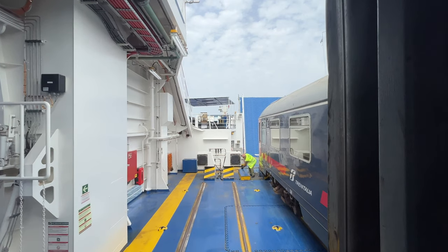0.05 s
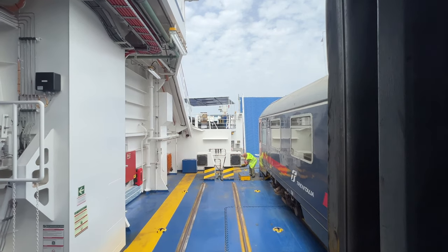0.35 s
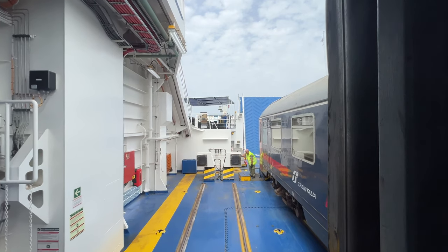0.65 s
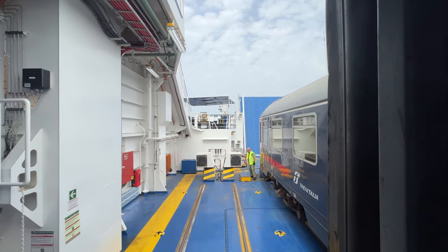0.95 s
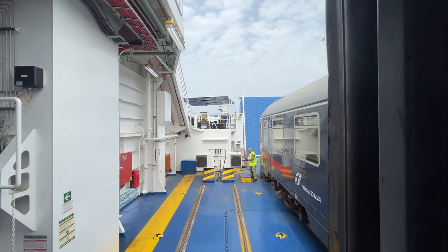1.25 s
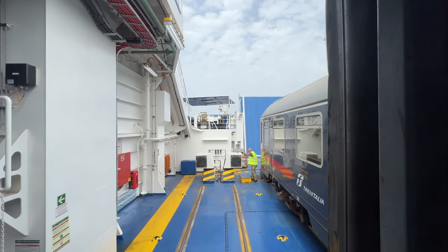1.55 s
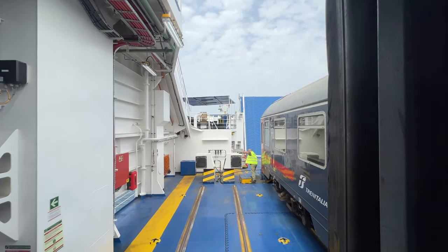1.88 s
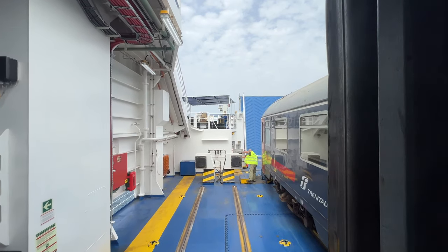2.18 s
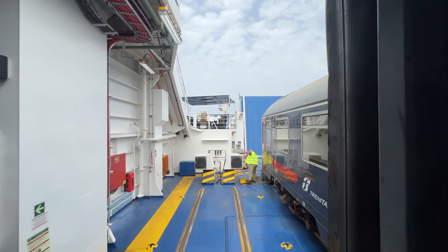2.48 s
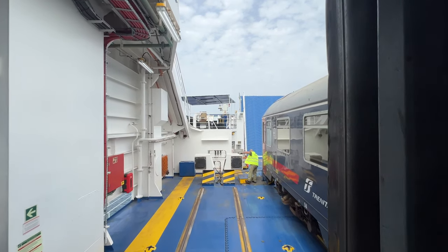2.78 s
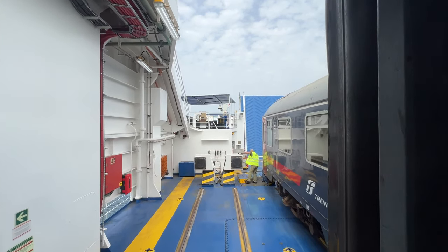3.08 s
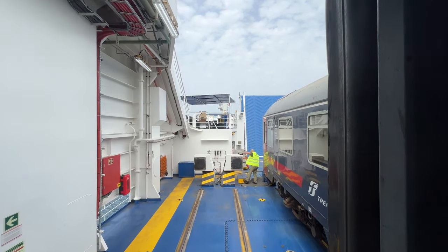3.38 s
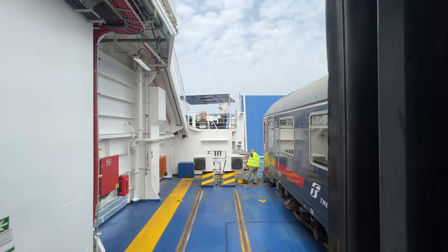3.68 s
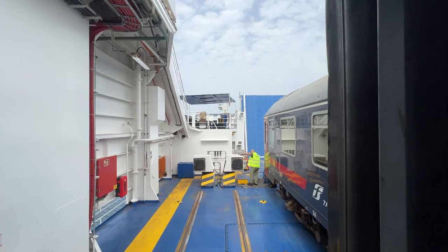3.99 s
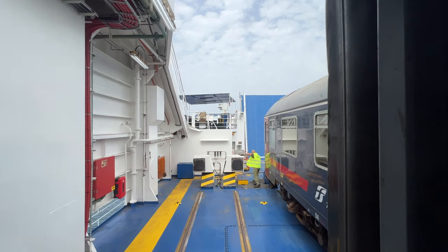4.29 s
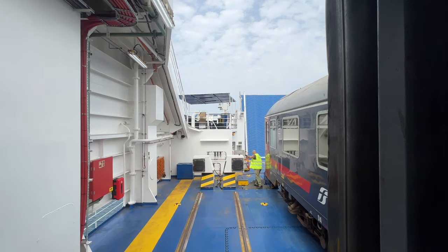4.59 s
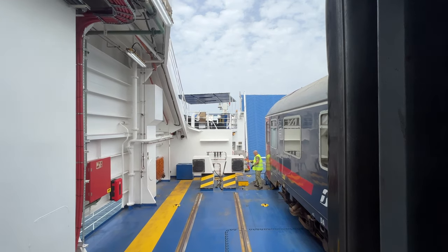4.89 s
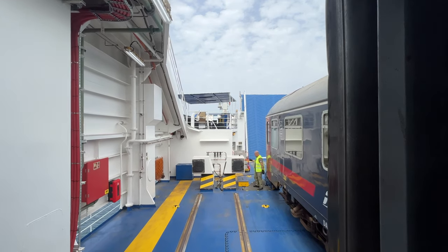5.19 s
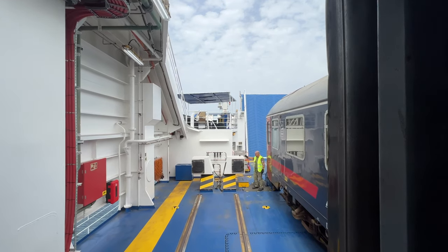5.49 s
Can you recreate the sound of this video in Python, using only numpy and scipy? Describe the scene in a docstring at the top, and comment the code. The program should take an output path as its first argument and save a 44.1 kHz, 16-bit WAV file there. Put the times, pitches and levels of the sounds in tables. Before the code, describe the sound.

A rail carriage rolls slowly onto the steel deck of a ferry, heard from beside the track. Right away a wheel grinds and strikes a joint with a sharp, ringing clank and a trailing clatter. Midway comes a cluster of heavy thumps that boom through the deck, followed by a few softer knocks. Low wheel rumble, rushing ventilation and the ship's machinery hum continue underneath, with a dull knock at the end.

```python
"""Wheels knock, grind and clank sharply over a rail joint, heard from beside the track: a rail carriage
is being pushed slowly onto the steel deck of a ferry. Later comes a heavy thump among smaller ones.
Each blow booms a deck panel and rings wheel and rail; the steel walls ring on.
Underneath are wheel rumble, ventilation noise, soft scuffs and the hum of the ship's machinery."""
import sys
import numpy as np
from scipy import signal
from scipy.fft import rfft, irfft, next_fast_len
from scipy.io import wavfile
from scipy.ndimage import uniform_filter1d, minimum_filter1d

SR = 44100
rng = np.random.default_rng(int(sys.argv[2]) if len(sys.argv) > 2 else 0)


def int16_out(signal):
    """Quantize to a 16-bit WAV file."""
    q = np.round(np.clip(np.atleast_2d(signal).T, -1, 1) * 32767)
    wavfile.write(sys.argv[1], SR, q.astype(np.int16))


N = 249165

# wheels on joints; hardness 0 is cushioned, 1 is bare steel:
# start_s, force_db, hardness, panel_hz, boom_db, favoured_hz
WHEEL_BLOWS = [ (0.000, -32.5, 0, 191.5, -34, 1320), (0.040, -31.5, 0.2, 195, -40, 397),
               (0.103, -34, 0.4, 150, -25.5, 1300), (0.14, -48, 0.6, 204.5, -28.5, 1410),
               (0.256, -15.5, 1, 137.5, -16.5, 1240), (0.284, -19.5, 0.99, 193, -21.5, 1000),
               (0.303, -20, 0.93, 151.4, -20.5, 1450), (0.338, -21.5, 0.94, 139.5, -24.5, 636),
               (0.372, -24.5, 0.9, 151, -37, 940), (0.411, -27.5, 0.92, 172, -24.5, 1220),
               (0.500, -28.5, 0.87, 174.4, -27.5, 990), (0.585, -26.5, 0.74, 177.4, -30.5, 1040),
               (0.690, -31.5, 0.67, 249, -43, 1290), (0.89, -31, 0.2, 116, -36, 1240),
               (2.074, -26.5, 0.1, 204.6, -29, 325), (2.13, -32, 0.2, 248, -31, 557),
               (2.594, -24.5, 0.4, 147.8, -25, 1300), (2.609, -22.5, 0.3, 192.2, -18, 1380),
               (2.649, -23, 0.1, 149.6, -20.5, 298), (2.724, -22, 0.86, 159, -21, 1216),
               (2.734, -15.5, 0.77, 195.7, -11, 1244), (2.747, -15, 0.64, 157.6, -22.5, 1310),
               (2.760, -15.5, 0.57, 193.4, -10, 552), (2.782, -27, 0.2, 98.2, -31, 1260),
               (2.823, -15, 0.41, 189.3, -14, 1310), (2.868, -29.5, 0.2, 276.5, -26, 550),
               (2.955, -21, 0.2, 180.7, -24.5, 490), (2.977, -20, 0.42, 186.8, -17.5, 864),
               (3.050, -22.5, 0.41, 161.1, -21, 990), (3.100, -31, 0.55, 187.6, -25, 1390),
               (3.502, -26, 0.35, 150.6, -21.5, 1220), (3.516, -30.5, 0.4, 298, -22.5, 1190),
               (3.556, -29.5, 0.3, 247, -31, 1270), (5.590, -26, 0.2, 330, -33, 347),
               (5.615, -20.5, 0.32, 201, -25.5, 487)]
# wheel and rail modes: pitch_hz
STEEL_HZ = [474, 527, 569, 633, 694, 787, 827, 954, 1007, 1035, 1069, 1151, 1198, 1248, 1335, 1385, 1431,
            1553, 1690, 1993, 2223, 2390, 2498, 2681, 2869, 3321, 3607, 3817]
# their strengths: level_db
STEEL_DB = [-5, -11.5, -12.5, -3, -11.5, -17, -14, -7.5, -5.5, -7, -16, -5, -6.5, -7, -3.5, -5.5, -9.5, -7,
            -18.5, -18, -19, -24.5, -25.5, -25, -24, -26.5, -33.5, -23]
# noise spectra: freq_hz, relative_density_db
DECK_SPECTRUM = [(50, -25), (110, -6.5), (160, 5.5), (270, -3), (420, -9), (600, -8), (850, -12.5),
                 (1400, -22), (3000, -57.5), (9000, -81)]  # weak modes of the deck
GEAR_SPECTRUM = [(300, -19.5), (800, -6), (1000, -5.5), (1300, 0.5), (1450, -3), (1620, -11), (2200, -21),
                 (3000, -26.5), (4200, -35), (9000, -74.5)]  # weak modes of the running gear
CRACK_SPECTRUM = [(1000, -25), (1900, 12), (2700, 5), (3800, -0.5), (5000, -2.5), (6300, -6.5),
                  (7800, -4.5), (9300, -10), (11000, -32.5)]  # hard contact
RUMBLE_SPECTRUM = [(10, -26.5), (25, -19), (38, -12.5), (50, 4.5), (75, -2.5), (115, -1.5), (165, -9.5),
                   (240, -15), (330, -16), (450, -26.5), (900, -75)]  # rolling wheels
RUSH_SPECTRUM = [(150, -11.5), (450, -2), (620, -3), (800, -2.5), (1000, -0.5), (1250, 1), (1420, -1),
                 (1750, -13), (2700, -18.5), (4000, -23), (5000, -31), (6300, -35), (9000, -35),
                 (11000, -53)]  # fans and wheels
SCUFF_SPECTRUM = [(2000, -28), (3600, -8), (4300, -3.5), (5200, -6), (6200, -4.5), (7600, 2.5),
                  (9500, -3.5), (11500, -27)]  # high hiss
GRIND_SPECTRUM = [(120, -11), (200, 16.5), (330, 0.5), (600, -26), (900, -4.5), (1300, 5.5), (1450, 0),
                  (1700, -12), (3500, -31), (5000, -31.5), (7600, -38.5), (10500, -48)]  # wheel friction
# resonances driven by fans and rolling: centre_hz, width_hz, gain_db
RUSH_PEAKS = [(554, 30, 4), (640, 30, 4), (840, 60, 5.5), (982, 50, 7), (1135, 73, 2), (1218, 40, 6),
              (1290, 37, 3.5), (1347, 30, 6), (1510, 20, 4), (2204, 98, 5.5), (2870, 240, -0.5),
              (3800, 350, 1), (4300, 400, -2.5), (5030, 250, 4.5)]
# swells of hiss: centre_s, half_width_s, level_db, tilt_db_per_octave
SCUFFS = [(0.017, 0.14, -55.5, -3.5), (0.783, 0.04, -66.5, -3), (0.917, 0.039, -70, -2),
          (1.098, 0.06, -64, 0), (1.212, 0.017, -70, -5), (1.744, .044, -59.5, -22), (3.847, 0.11, -70, -5),
          (4.353, 0.03, -67, -18), (4.835, .04, -59.5, -20), (5.039, .035, -64, -13)]
# a wheel loads a joint, then drops off: drop_s, level_db, build_s
GRINDS = [(0.245, -35, 0.79), (2.72, -29.5, 0.21)]
# machinery lines: pitch_hz, level_db
HUM_LINES = [(49.4, -43), (98.5, -43.5), (122, -48.5), (147.5, -51.5), (196.7, -44), (245, -54),
             (296.1, -54), (353, -53.5), (394, -66), (542, -64.5), (608.3, -59.5), (1220, -60)]
# first bite of steel on steel: start_s, level_db, t60_s
BITE = (0.2575, -29.5, 0.031)
# its bright modes: pitch_hz, relative_db
BITE_MODES = [(2150, 9), (3950, 2), (4620, 3.5), (4880, -2), (5120, 0), (5450, -6), (6250, -35),
              (7400, -10)]
# likeness of the two microphones: freq_hz, correlation
MIC_CORRELATION = [(50, 0.82), (150, 0.85), (220, 0.88), (330, 0.28), (550, 0.033), (9000, 0.025)]
# shading of the right microphone: freq_hz, left_minus_right_db
MIC_SHADE = [(45, 3), (100, 5), (200, 4), (500, 4), (800, 2.5), (1230, 9), (1600, -2), (2700, 4.5),
             (3900, 0), (5000, 11.5), (6500, 15.5), (8000, 7), (9200, 1)]

# cushioned, bare steel; levels relative to the force
CONTACT_S = (0.0049, 0.0017)
RING_DB = (-27, 4)
CRACK_DB = (-95.5, -11)


def undb(db):
    """Decibels to gain."""
    return 10 ** (np.asarray(db) / 20)


def unit_rms(x):
    """Scale to rms 1."""
    return x / np.sqrt(np.mean(x ** 2))


def on_bins(points, size):
    """Interpolate (freq_hz, value) points onto FFT bins, on a log axis."""
    hz, value = np.transpose(points)
    return np.interp(np.log(np.fft.rfftfreq(size, 1 / SR) + 1), np.log(hz), value)


def resonance_db(freq_hz, peaks):
    """Summed gain of (centre_hz, width_hz, gain_db) resonances."""
    return sum(db / (1 + (2 * (freq_hz - hz) / width_hz) ** 2) for hz, width_hz, db in peaks)


def noise(spectrum, size, peaks=()):
    """Coloured stereo noise, rms 1: correlated in the bass, diffuse above."""
    span = next_fast_len(size, True)
    colour_db = on_bins(spectrum, span) + resonance_db(np.fft.rfftfreq(span, 1 / SR), peaks)
    mid, side = rfft(rng.standard_normal((2, span)))
    alike = np.clip(on_bins(MIC_CORRELATION, span), 0, 1)
    mid, side = mid * np.sqrt(1 + alike), side * np.sqrt(1 - alike)
    channels = np.array([mid + side, mid - side]) * undb(colour_db)
    return unit_rms(irfft(channels, span)[:, :size])


def wander(rate_hz):
    """Smooth random drift, rms 1."""
    hold = int(SR / rate_hz)
    steps = np.repeat(rng.standard_normal(N // hold + 1), hold)
    return unit_rms(uniform_filter1d(uniform_filter1d(steps, hold), hold)[:N])


def decay(t, t60_s):
    """Free decay, 60 dB down at t60_s."""
    return np.exp(-np.log(1000) * t / t60_s)


def tailed_decay(t, t60_s, tail_db, tail_t60_s):
    """Decay of a struck part plus a weaker tail held by the steel walls."""
    return np.hypot(decay(t, t60_s), undb(tail_db) * decay(t, tail_t60_s))


def add(out, start_s, sound):
    """Mix a sound in at start_s."""
    start = max(int(start_s * SR), 0)
    part = sound[..., :max(N - start, 0)]
    out[:, start:start + part.shape[-1]] += part


def panel_boom(t, pitch_hz, mid_panel_hz=171.6):
    """Low note of a struck deck panel; smaller, higher panels die sooner."""
    scaled_t = t * pitch_hz / mid_panel_hz
    envelope = tailed_decay(scaled_t, t60_s=0.38, tail_db=-22, tail_t60_s=0.8)
    return envelope * np.sin(2 * np.pi * pitch_hz * t)


def steel_modes(t, max_beat_hz=9, twin_db=-5):
    """Wheel and rail modes as beating pairs, phased apart at the microphones: (channel, mode, time)."""
    start, spread, twin_start, split = rng.random((4, len(STEEL_HZ)))
    mic_phase = 2 * np.pi * start + .8 * np.pi * np.array([spread - .5, .5 - spread])
    phase = mic_phase[:, :, None] + 2 * np.pi * np.outer(STEEL_HZ, t)
    beat_phase = 2 * np.pi * (twin_start[:, None] + np.outer(max_beat_hz * (2 * split - 1), t))
    pairs = np.sin(phase) + undb(twin_db) * np.sin(phase + beat_phase)
    return pairs * tailed_decay(t, t60_s=0.33, tail_db=-19, tail_t60_s=1.0)


def blows_and_rebounds(t, gap_s=.042, gap_scatter=.12, rebound_db=-9):
    """Each blow with its boom; the wheel then drops back once, too lightly to boom the panel."""
    for start_s, force_db, hardness, panel_hz, boom_db, favoured_hz in WHEEL_BLOWS:
        yield start_s, force_db, hardness, undb(boom_db) * panel_boom(t, panel_hz), favoured_hz
        rebound_s = start_s + gap_s * np.exp(gap_scatter * rng.standard_normal())
        yield rebound_s, force_db + rebound_db, hardness, 0, favoured_hz


def wheel_blows(deck_db=-8.5, modes_db=-10, gear_db=-2, crack_swell_s=0.033,
                noise_favour_db=7.5, mode_favour_db=11, favour_width_hz=160):
    """Wheels strike joints, shaking the deck; harder, shorter contacts ring the steel more and crack."""
    out, size = np.zeros((2, N)), 3 * SR // 4
    t = np.arange(size) / SR
    deck_envelope = tailed_decay(t, t60_s=0.6, tail_db=-4, tail_t60_s=0.85)
    gear_envelope = tailed_decay(t, t60_s=0.31, tail_db=-13, tail_t60_s=0.92)
    crack_envelope = tailed_decay(t, t60_s=0.43, tail_db=-9, tail_t60_s=0.4)
    crack_envelope *= 1 - np.exp(-t / crack_swell_s)  # builds up between the walls
    modes = steel_modes(t)
    for start_s, force_db, hardness, boom, favoured_hz in blows_and_rebounds(t):
        contact_s = np.interp(hardness, (0, 1), CONTACT_S)
        ring_db = np.interp(hardness, (0, 1), RING_DB)
        crack_db = np.interp(hardness, (0, 1), CRACK_DB)
        # the point of contact favours some modes
        noise_peak = [(favoured_hz, favour_width_hz, noise_favour_db)]
        lift_db = resonance_db(np.array(STEEL_HZ), [(favoured_hz, favour_width_hz, mode_favour_db)])
        deck = undb(deck_db) * deck_envelope * noise(DECK_SPECTRUM, size, noise_peak)
        tones = undb(modes_db + np.array(STEEL_DB) + lift_db) @ modes
        gear = undb(gear_db) * gear_envelope * noise(GEAR_SPECTRUM, size, noise_peak)
        crack = undb(crack_db) * crack_envelope * noise(CRACK_SPECTRUM, size)
        ring = undb(ring_db) * (tones + gear)
        attack = 1 - np.exp(-t / contact_s)
        add(out, start_s, attack * (boom + undb(force_db) * (deck + ring + crack)))
    return out


def rolling_and_fans(rumble_db=-37.5, fan_db=-45, rolling_extra_db=6, slowing_s=2.1):
    """Wheel rumble through the deck, and a rush that settles to fan level as the carriage slows."""
    speed = np.exp(-np.arange(N) / SR / slowing_s)
    rumble = noise(RUMBLE_SPECTRUM, N) * undb(rumble_db + 1.3 * wander(rate_hz=12))
    rush = noise(RUSH_SPECTRUM, N, RUSH_PEAKS)
    rush_db = fan_db + rolling_extra_db * speed + .5 * wander(rate_hz=23)
    return rumble + rush * undb(rush_db)


def machinery(waver_db=3, waver_rad=0.33, hidden_db=-11, emerge_s=0.99):
    """Engine and fan lines waver in level and phase, rising from behind the rolling noise."""
    t = np.arange(N) / SR
    hum = np.zeros(N)
    for pitch_hz, level_db in HUM_LINES:
        gain = undb(level_db + waver_db * wander(rate_hz=12))
        hum += gain * np.sin(2 * np.pi * pitch_hz * t + waver_rad * wander(rate_hz=12))
    return undb(hidden_db * np.exp(-t / emerge_s)) * hum


def scuffs(grain_db=1.5):
    """Short grainy swells of hiss, some duller than others."""
    out, size = np.zeros((2, N)), SR // 2
    for centre_s, half_width_s, level_db, tilt_db_per_octave in SCUFFS:
        start_s = max(centre_s - size / SR / 2, 0)
        t = start_s + np.arange(size) / SR
        spectrum = [(hz, db + tilt_db_per_octave * np.log2(hz)) for hz, db in SCUFF_SPECTRUM]
        swell = np.exp(-((t - centre_s) / half_width_s) ** 2)
        add(out, start_s, undb(level_db) * swell * noise(spectrum, size))
    return out * undb(grain_db * wander(rate_hz=120))


def grinding(rough_db=1.5, release_s=0.024):
    """Uneven friction grows as a wheel loads a joint and dies as it drops off."""
    t = np.arange(N) / SR
    load = sum(undb(level_db) * np.exp(np.minimum((t - drop_s) / build_s, (drop_s - t) / release_s))
               for drop_s, level_db, build_s in GRINDS)
    return noise(GRIND_SPECTRUM, N) * load * undb(rough_db * wander(rate_hz=54))


def steel_bite(snap_db=-3, punch_db=-13, punch_hz=185, punch_t60_s=0.087, attack_s=0.0013):
    """Edge of the first clank: short high modes, a snap of noise and a low punch into the deck."""
    out = np.zeros((2, N))
    start_s, level_db, t60_s = BITE
    t = np.arange(SR // 5) / SR
    phases = 2 * np.pi * rng.random((len(BITE_MODES), 2, 1))
    ring = sum(undb(db) * np.sin(2 * np.pi * hz * t + phase)
               for (hz, db), phase in zip(BITE_MODES, phases))
    snap = undb(snap_db) * noise(CRACK_SPECTRUM, len(t))
    bright = undb(level_db) * decay(t, t60_s) * (ring + snap)
    punch = undb(punch_db) * decay(t, punch_t60_s) * np.sin(2 * np.pi * punch_hz * t)
    add(out, start_s, (1 - np.exp(-t / attack_s)) * (bright + punch))
    return out


def scene():
    """Blows over the steady sound of ship and carriage."""
    return wheel_blows() + steel_bite() + grinding() + machinery() + rolling_and_fans() + scuffs()


def record(dry):
    """Shaded, duller right microphone; fast peak limiter; steep low-pass."""
    ceiling, cutoff_hz = .95, 10900
    size = next_fast_len(N + SR // 10, True)
    shade_db = on_bins(MIC_SHADE, size) / 2
    shaded = irfft(rfft(dry, size) * undb(np.array([shade_db, -shade_db])), size)[:, :N]
    hold = SR // 300
    gain = ceiling / np.maximum(np.abs(shaded).max(axis=0), ceiling)
    limited = shaded * uniform_filter1d(minimum_filter1d(gain, hold), hold)
    return signal.sosfilt(signal.ellip(8, .2, 70, cutoff_hz, fs=SR, output="sos"), limited)


dry = scene()
out = record(dry)
int16_out(out)
```